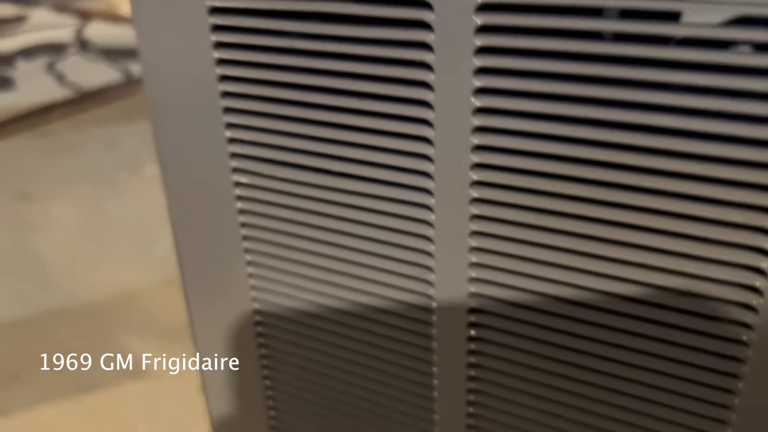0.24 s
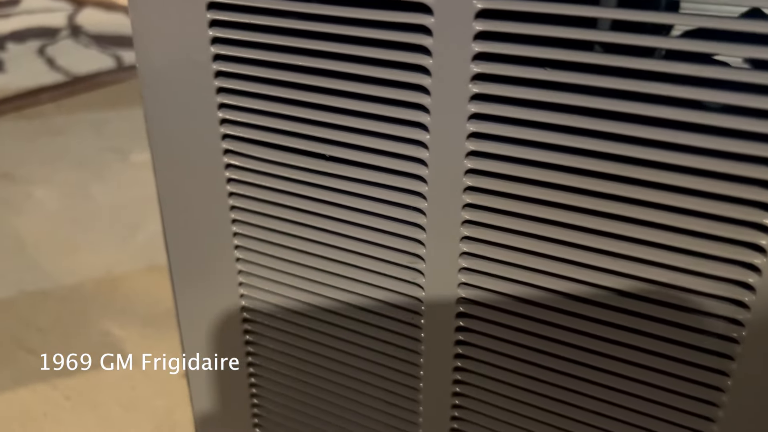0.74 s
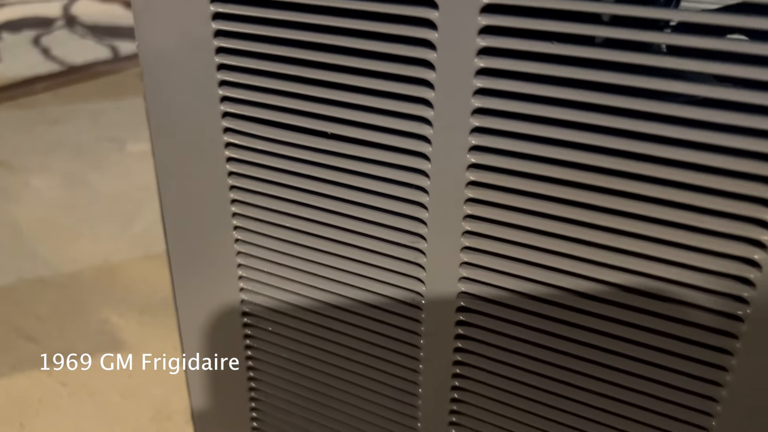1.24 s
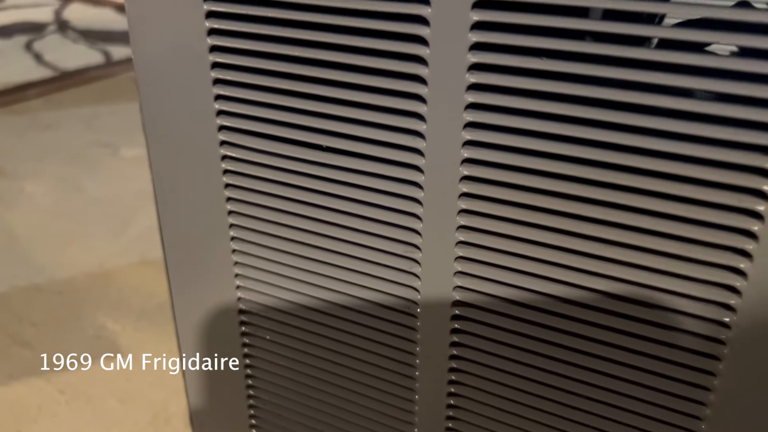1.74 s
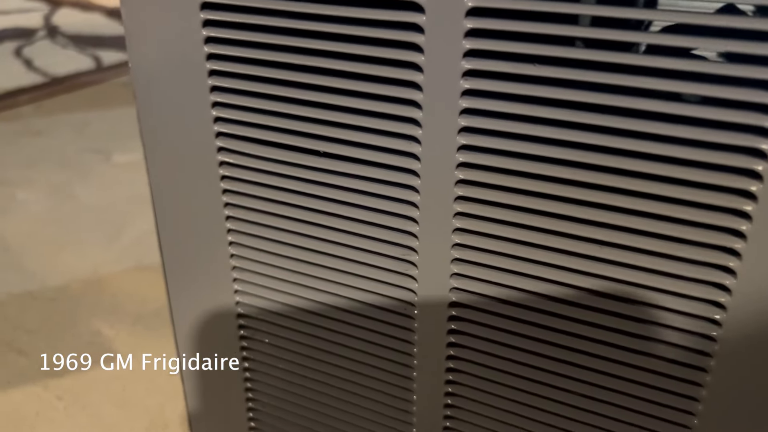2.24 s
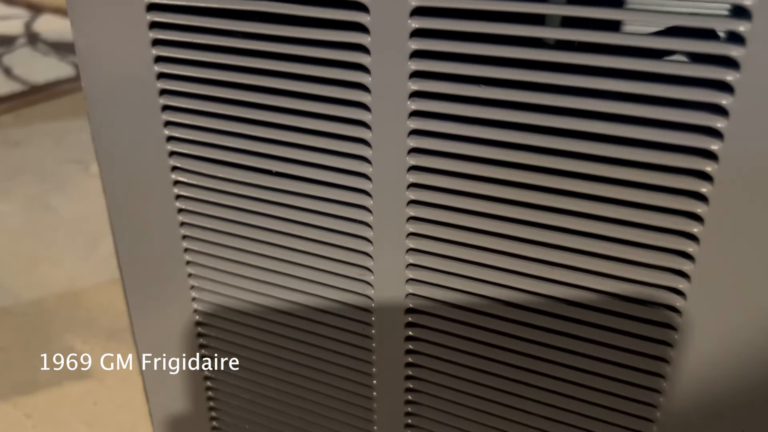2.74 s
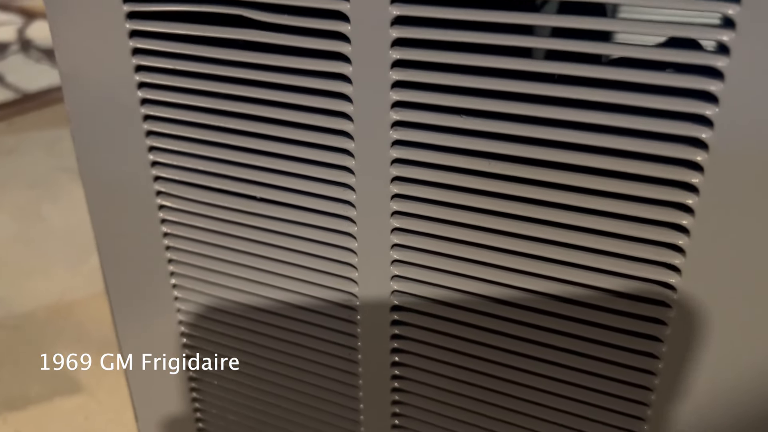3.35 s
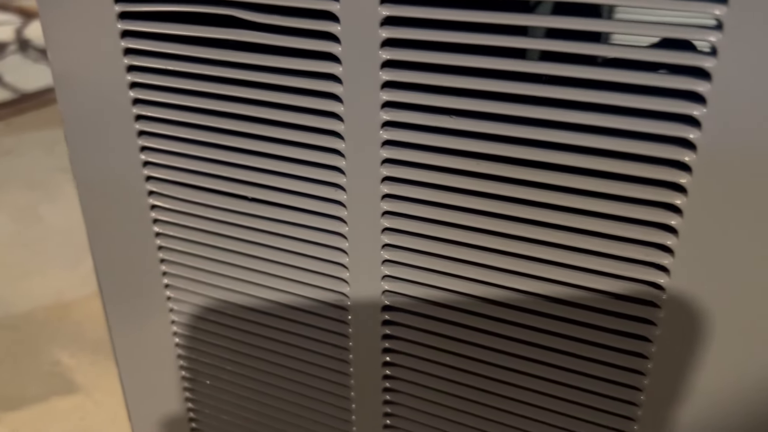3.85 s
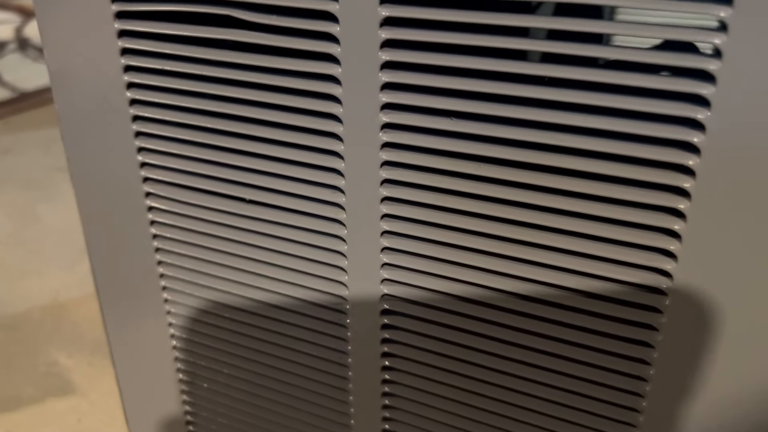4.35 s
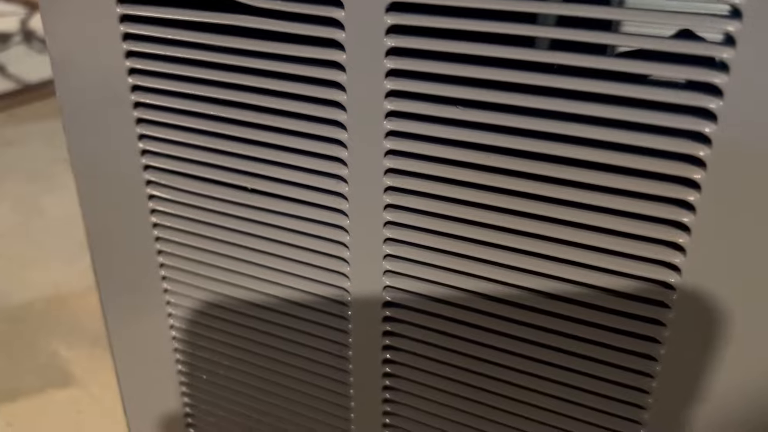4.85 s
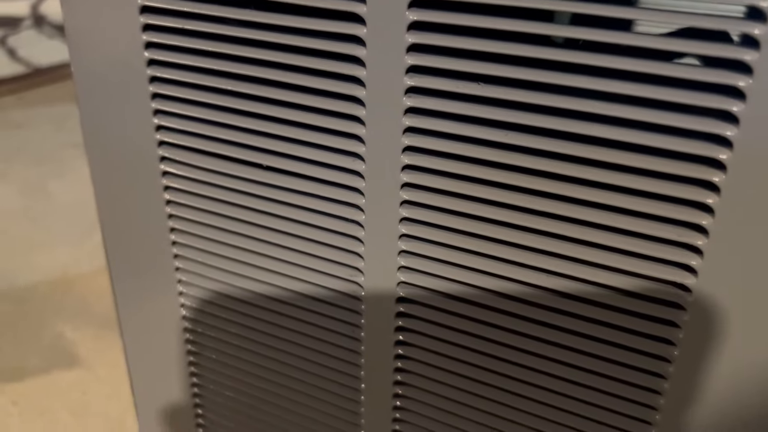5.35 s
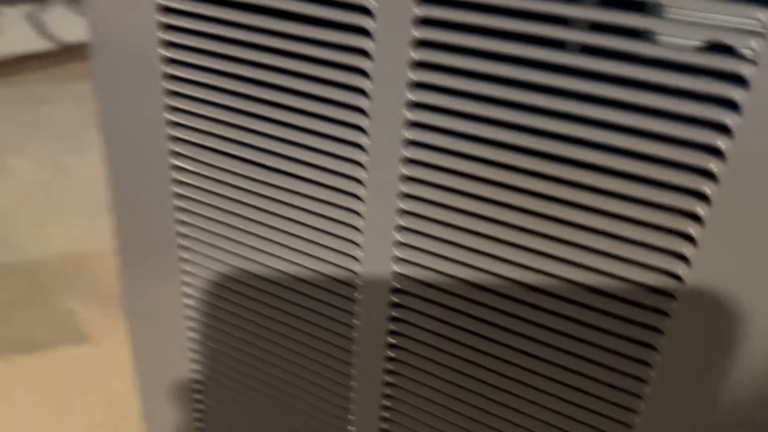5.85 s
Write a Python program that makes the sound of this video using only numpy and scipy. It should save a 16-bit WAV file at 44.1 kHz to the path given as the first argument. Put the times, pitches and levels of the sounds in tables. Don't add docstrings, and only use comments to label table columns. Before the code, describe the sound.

Close to a window air conditioner, a low airy fan rumble, a sharp relay clack, quick knocks, then a steady hissing metallic whine.

```python
import sys
import numpy as np
from scipy import signal
from scipy.fft import rfft, irfft, next_fast_len
from scipy.io import wavfile
from scipy.ndimage import uniform_filter1d, minimum_filter1d, map_coordinates

SR = 44100
rng = np.random.default_rng(int(sys.argv[2]) if len(sys.argv) > 2 else 0)


def store_pcm(level_fs):
    pcm = np.round(np.clip(level_fs, -1, 1) * 32767).astype(np.int16)
    wavfile.write(sys.argv[1], SR, np.atleast_2d(pcm).T)


def gain_from_db(level_db):
    decades = np.asarray(level_db, float) / 20
    return 10 ** decades


N = 268877
T = np.arange(N) / SR
HZ = np.fft.rfftfreq(next_fast_len(N), 1 / SR)

# time in seconds, level in dB.
RUMBLE_LEVEL = [(0, -38.5), (.3, -33), (1.0, -29.5), (1.27, -35.5), (1.59, -28.5), (2.45, -32), (2.7, -33),
                (3.75, -33), (3.95, -31.5), (5.8, -33), (5.98, -28), (6.1, -38)]
# frequency in Hz, level in dB per Hz.
RUMBLE_COLOUR = [(13, -51), (22, -14), (42, -10.5), (92, 2), (113, -3.5), (145, -16), (160, -21),
                 (210, -54), (350, -120)]
RUSH_COLOUR = [(76, -31), (130, -3), (284, -11), (321, -11.5), (474, -12), (509, -12.5), (587, -20.5),
               (779, -17), (1050, -21), (1420, -29.5), (2180, -30), (2790, -37), (3910, -41), (9000, -53.5),
               (11700, -99), (19800, -120)]
# frequency in Hz, wander in Hz, level in dB.
HUMS = [(119.2, 1.5, -40.5), (104.84, 4.07, -39.5), (87.8, 6.04, -42), (59.5, 2.8, -45.5)]
RUSH_TOP_DB = -60
RUSH_DB, RUSH_LOSS_DB = -37, -1.5
ENTRY_DB, ENTRY_S = -3, 0.12
SHAKE_DB, SHAKE_FROM_S, SHAKE_RISE_S = -48.5, 1.36, 0.86

# time in seconds, peak in dB, ring in seconds, brightness in dB.
KNOCKS = [
    (1.139, -37, 0.036, -1),
    (1.142, -33, 0.057, -1),
    (1.155, -35, 0.074, -7),
    (1.188, -46, 0.046, -8),
    (1.275, -41, 0.1, -3),
    (1.354, -41, .12, -2),
    (1.395, -42, .1, -1),
    (1.423, -37, 0.087, -4),
]
# time in seconds, peak in dB, ring in seconds, brightness in dB.
BOUNCES = [
    (1.147, -36, .05, -4),
    (1.167, -42, .06, -7),
    (1.205, -44, .06, -16),
    (1.232, -48, 0.055, -16),
]
# frequency in Hz, level in dB, 60 dB fade in seconds.
RELAY_MODES = [(226, 3.5, 0.077), (382, -3, .05), (438, 4, 0.044), (1380, -0.5, 0.045), (1626, 1, 0.043),
               (1810, -8, .03), (2065, 0, 0.064), (2260, -14, 0.12), (3040, -13, .04), (5200, -20, 0.03),
               (7370, -10, .012), (8800, -6, 0.012), (9690, -2, 0.015)]
SHELL_MODES = [(1484, -5, 0.061), (1870, -13, 0.066), (2780, -7, 0.093), (2845, -9, 0.098), (3130, -20, .1),
               (4300, -14, .04), (4830, -19, 0.065), (5900, -16, .1), (8600, -19, .08)]

# frequency in Hz, start and end in seconds, level in dB.
HELD = [
    (3290, 1.403, 1.487, -49),
    (2790, 1.42, 1.50, -57),
    (4780, 1.36, 1.44, -67),
    (5880, 1.357, 1.39, -62),
    (2860, 1.362, 1.40, -61),
]
HELD_EDGE_S = .004

# time in seconds,
# pitch of order 25 in Hz.
SHAFT = [(1.6, 1466), (5.94, 1459), (6.1, 1452)]
# time in seconds, share of full speed.
RUN_UP = [(1.35, .35), (1.42, .65), (1.47, .92), (1.51, 1)]
TICK_S = 3.0037

# place as part of a turn, level in dB, decay in ms.
VALVES = [
    (0.0, 2, 2.1),
    (.45, -12, 2),
]
# frequency in Hz, level in dB per Hz.
GAS_LOW_COLOUR = [(500, 9), (1000, -3), (1500, 0), (2000, -10.5), (2450, -10), (2780, -3.5), (3050, -8.5),
                  (3600, -13.5), (3800, -13), (3960, -14), (4130, -9), (4300, -2.5), (4550, -8.5),
                  (4900, -9), (5300, -8), (6000, -7)]
GAS_TOP_COLOUR = [(6000, -9), (6700, -8.5), (7000, -20), (7300, -0.5), (7700, -5.5), (8300, 0), (8900, 1),
                  (10000, -1.5), (10700, -2), (11100, 2), (11450, -3.5), (12000, -1), (13000, -3),
                  (15800, -3)]
# time in seconds, half length in seconds, level change in dB.
TOP_SWAY = [(3.1, 0.41, 2), (4.7, .45, 0.5)]
GAS_START_S = 1.36
HISS_DB, HISS_DB_PER_OCT = -45, 16
TOP_DB, TOP_DB_PER_OCT = -42.5, 5.5
SURGE_DB, SURGE_S = 1.5, 0.24
TICK_HZ, TICK_WIDTH_HZ, TICK_DB = 12500, 530, 1.5
# frequency and half width in Hz, time and half length in s, change in dB.
SHADOWS = [(4850, 170, 2.9, .6, -11), (6000, 250, 4.8, .7, -6), (4600, 250, 1.62, .15, -8),
           (3600, 200, 5.5, .2, -5), (3600, 200, 3.2, .4, -5), (3950, 150, 3.8, .25, -5),
           (3900, 200, 2.4, .6, -4), (3950, 200, 4.9, .35, 4), (12750, 250, 2.95, .45, 4),
           (12400, 300, 5.4, .8, -3), (7250, 100, 3.0, .6, -6), (6550, 100, 5.6, .5, -5),
           (5000, 100, 1.45, .1, -8)]

# frequency in Hz, width in Hz.
PANELS = [(3620, 120), (4540, 75), (5330, 220), (6960, 150), (7680, 40), (8330, 120), (8620, 60)]
PANEL_DB = [-62, -59.5, -57, -57.5, -65, -56.5, -66]
# time in seconds, half length in seconds, level change in dB.
PANEL_SWAY = [
    [(2.1, 1, 11)],
    [(2.3, 0.17, 2), (3.4, 0.39, 15), (4.37, 0.16, 7)],
    [(1.7, 0.32, 5.5), (4.95, .15, 1), (5.55, 0.54, 4.5)],
    [(1.65, 0.23, 4.5), (3.7, 0.3, 6.5), (4.3, 0.22, 5), (4.65, 0.14, 11), (5.5, 0.56, 6.5)],
    [(2.9, 0.64, 16)],
    [(2.3, 0.099, 3.5), (3.4, 0.41, 0), (4.35, 0.11, 5), (5.35, 0.98, 11.5)],
    [(3.6, 0.46, 18)],
]
# frequency in Hz, width in Hz.
SWEPT = [(1480, 70), (1830, 50), (2850, 130), (3290, 60)]
# level in dB at full speed, dB per octave of speed.
SWEPT_DB = [(-42, 13), (-52.5, 1), (-57, 5), (-48, 17)]
# time in seconds, half length in seconds, level change in dB.
SWEPT_SWAY = [
    [(1.38, .03, 2), (1.47, .04, 0)],
    [(1.40, .03, 3)],
    [(1.432, .012, 5), (1.37, .02, -2), (1.47, .03, 2)],
    [(1.36, 0.03, -25), (1.415, .025, 9), (1.493, .008, -9), (1.52, .025, 8)],
]

ORDER_NUMBERS = [6, 8, 10, 16, 17, 19, 24, 26, 27, 30, 31, 44, 46, 47, 48, 50, 54, 57]
ORDER_DB = [-55, -53, -48, -53, -58, -59.5, -57, -55, -59, -60, -54.5, -67, -65, -58.5, -60, -63, -56, -58]
ORDER_PAN_DB = [0, 0, 0, 5, 3, 0, -4, -4, 0, -3, -3, 3, 5, 6, 6, 3, 5, 4]
# level in dB at 2 s, change in dB per second as the speed sags.
LEADS = [(-46.5, -0.44), (-47, 0.87), (-48.5, -1.5)]
LEAD_PAN_DB = [-6, 5.5, 4.5]
# time in seconds, half length in seconds, level change in dB.
LEAD_SWAY = [
    [(1.5, 0.04, 8.5), (1.86, 0.089, -4), (2.57, 0.14, 2.5), (3.45, 0.28, 6), (4.82, .08, -3)],
    [(1.55, 0.087, -10), (2.2, .1, -3), (2.42, .15, 4), (2.95, 0.13, 4.5), (3.7, 0.2, -3.5),
     (4.33, 0.11, 3), (4.47, 0.071, -2), (4.8, 0.45, 3)],
    [(1.68, 0.16, 6.5), (2.1, 0.17, 3.5), (2.35, 0.065, -7), (3.48, 0.055, -11), (4.44, 0.085, -3),
     (4.8, 0.065, -5)],
]
CHIRP_ORDER, CHIRP_S, CHIRP_HALF_S, CHIRP_DB = 58, 1.425, .018, -56
LEAVE_S, LEAVE_DB_PER_S = 5.9, -22

# frequency in Hz, likeness from 0 to 1.
LIKENESS = [(250, 1.0), (500, .75), (850, .25), (1300, .5), (2200, .5), (3300, .6), (3900, .25), (4500, .5),
            (5600, .2), (6700, .9), (7500, .75), (9200, .92), (9600, 1), (10400, 1), (11400, .8),
            (12900, 1), (14000, 1), (15000, .8)]
# frequency in Hz, lead in radians.
PORT_LEAD = [(0, 0), (1600, .1), (3400, 1.4), (3700, 1.9), (4000, 1.6), (4300, .8), (5400, 1.2), (6400, 0),
             (7000, -.2), (9550, -np.pi), (10300, -np.pi), (13000, -2 * np.pi), (14100, -2 * np.pi),
             (15800, -8.9)]
# frequency in Hz, difference in dB.
PORT_LEAN = [(200, 0), (700, -2.5), (950, 6), (1450, 0), (2400, 2.5), (4400, 2), (5400, 6), (6500, 2),
             (8300, 1.5), (9200, 2)]

# frequency in Hz, rise of the silencing threshold in dB.
SPILL = [(2400, 0), (3300, 0), (3420, 5.5), (3650, 2.5), (3850, 4), (4100, 2.5), (4300, 0), (4600, 0),
         (4800, 2), (5100, 0), (5800, 0), (6000, 1), (6200, 0), (8900, 0), (9300, 2), (10800, 2),
         (11300, 0)]
SPILL_FLICKER_DB, SPILL_FROM_S, SPILL_RISE_S = 2.2, 1.5, .6
DROP_DB, DROP_FLICKER_DB, MASK_BANDS = -12.5, 1.6, 14
BUSY_DB = -12

SIDES = np.array([[1], [-1]])


def rms_one(x):
    return x / np.sqrt(np.mean(x ** 2) + 1e-20)


def in_time(rows):
    s, *columns = np.transpose(rows)
    return [np.interp(T, s, column) for column in columns]


def at_hz(points, hz=HZ):
    known_hz, values = np.transpose(points)
    return np.interp(np.log(hz + 1), np.log(known_hz + 1), values)


def coloured(x, gain):
    size = next_fast_len(N)
    return irfft(rfft(x, size) * gain, size)[..., :N]


def drift(rate, count=1):
    knots = rng.standard_normal((count, int(N / SR * rate) + 3))
    coarse = np.array([map_coordinates(k, [T[::64] * rate], order=3) for k in knots])
    return coarse.repeat(64, axis=1)[:, :N]


def swayed(spots):
    swells = sum(db * np.exp(-((T - s) / half_s) ** 2) for s, half_s, db in spots)
    return swells + LEAVE_DB_PER_S * np.maximum(T - LEAVE_S, 0)


def ports(pair):
    size = next_fast_len(N)
    alike = np.clip(at_hz(LIKENESS), 0, 1)
    turn = np.exp(.5j * np.interp(HZ, *np.transpose(PORT_LEAD))) * gain_from_db(at_hz(PORT_LEAN) / 2)
    a, b = rfft(pair, size)
    shared = np.sqrt((1 + alike) / 2) * a
    own = np.sqrt((1 - alike) / 2) * b
    return irfft([(shared + own) * turn, (shared - own) / turn], size)[:, :N]


def fan():
    rumble_db, = in_time(RUMBLE_LEVEL)
    shake = np.clip((T - SHAKE_FROM_S) / SHAKE_RISE_S, 0, 1)

    low = gain_from_db(at_hz(RUMBLE_COLOUR)) / (1 + (30 / (HZ + 1)) ** 6) / (1 + (HZ / 170) ** 8)
    rumble = rms_one(coloured(rng.standard_normal(N), low)) * gain_from_db(-3.5)
    for hz, width_hz, level_db in HUMS:
        cycles = np.cumsum(hz + width_hz * drift(5)[0]) / SR
        rumble += gain_from_db(level_db + 37.5 + 2.2 * drift(4.004)[0]) * np.sin(2 * np.pi * cycles)

    rush_db = RUSH_DB + RUSH_LOSS_DB * shake + ENTRY_DB * np.exp(-T / ENTRY_S)
    below = [point for point in RUSH_COLOUR if point[0] < 10000]
    top = [(11500, RUSH_TOP_DB), (16000, RUSH_TOP_DB - 9)]
    colour = gain_from_db(at_hz(below + top)) / (1 + (125 / (HZ + 1)) ** 8)
    rush = rms_one(coloured(rng.standard_normal((2, N)), colour))

    shake_colour = 1 / (1 + (HZ / 280) ** 4) / (1 + (60 / (HZ + 1)) ** 4)
    apart = rms_one(coloured(rng.standard_normal(N), shake_colour))
    mixed = ports(gain_from_db(rush_db + 3) * rush) + gain_from_db(rumble_db) * rms_one(rumble)
    return mixed + gain_from_db(SHAKE_DB) * shake * apart * SIDES


def ring(clicks, hz, t60):
    r, w = gain_from_db(-60 / (t60 * SR)), 2 * np.pi * hz / SR
    return signal.lfilter([0, np.sin(w)], [1, -2 * r * np.cos(w), r * r], clicks + 1e-18)


def knocks(blows):
    out = np.zeros((2, N))
    length = round(.4 * SR)
    t = T[:length]
    high_pass = signal.butter(2, 2500, "high", fs=SR, output="sos")
    for k, (s, peak_db, t60, bright_db) in enumerate(blows):
        i = round(s * SR)
        fade = gain_from_db(-60 * t / t60) + gain_from_db(-28 - 60 * t / 0.36)
        crack = rng.standard_normal((2, length)) * fade * (1 - np.exp(-t / .0003))
        modes = RELAY_MODES if k < 4 else SHELL_MODES
        push = crack * gain_from_db(-60 * t / 0.037)
        rings = sum(gain_from_db(db - 16.0 + rng.normal(0, 1)) * ring(push, hz, ring_s) for hz, db, ring_s in modes)
        bright = signal.sosfilt(high_pass, crack)
        out[:, i:i + length] += gain_from_db(peak_db) * (gain_from_db(bright_db) * bright + rings)
    return ports(out) + gain_from_db(-10) * out[0]


def turns():
    done = np.cumsum(in_time(SHAFT)[0] * in_time(RUN_UP)[0] / 25) / SR
    return done - done[round(TICK_S * SR)]


def held():
    out = 0
    for hz, start_s, end_s, level_db in HELD:
        on = (1 + np.tanh((T - start_s) / HELD_EDGE_S)) * (1 - np.tanh((T - end_s) / HELD_EDGE_S)) / 4
        lead = np.interp(hz, *np.transpose(PORT_LEAD)) / 2 * SIDES
        level = on * gain_from_db(level_db + 2.5 * drift(59.9)[0])
        tone = np.sqrt(2) * np.sin(2 * np.pi * hz * T + .6 * drift(40.2)[0] + lead)
        out = out + level * tone / np.maximum(abs(np.cos(lead)), .5)
    return out


def patchy(x, depth_db, width_hz, rate):
    hz, s, cells = signal.stft(x, SR, nperseg=512)
    knots = rng.standard_normal((80, 40))
    places = np.meshgrid(hz / width_hz, s * rate, indexing="ij")
    field = map_coordinates(knots, places, order=3, mode="mirror")
    shade_db = 0
    for at, wide, when, half_s, db in SHADOWS:
        shade_db = shade_db + db * np.exp(-((hz[:, None] - at) / wide) ** 2 - ((s - when) / half_s) ** 2)
    return signal.istft(cells * gain_from_db(depth_db * field + shade_db), SR, nperseg=512)[1][:, :N]


def panels(shaking, modes, levels):
    out, size = 0, next_fast_len(N)
    lines = rfft(shaking, size)
    for (hz, width_hz), level_db in zip(modes, levels):
        rung = irfft(lines / (1 + ((HZ - hz) / width_hz) ** 4), size)[:, :N]
        out = out + gain_from_db(level_db) * rms_one(rung)
    return out


def repeating(part):
    size, count = 1024, 5
    patterns = rng.standard_normal((2, count, size))[:, :, (part * size).astype(int)]
    blend = drift(0.99, count=count)
    return (patterns * blend).sum(axis=1) / np.sqrt((blend ** 2).sum(axis=0))


def gas_hiss(same, fresh, gate, octaves):
    share_db = at_hz([(800, -3.0), (1500, 0.0), (2200, -7.0), (3000, 3.5), (4500, 4.0), (6000, 7.0)])
    low = coloured(same, gain_from_db(share_db)) + fresh
    low = coloured(low, gain_from_db(at_hz(GAS_LOW_COLOUR)) * (HZ > 500) / (1 + (HZ / 6200) ** 16))

    split = 1 / (1 + (HZ / 10000) ** 16)
    colour = gain_from_db(at_hz(GAS_TOP_COLOUR)) / (1 + (6200 / (HZ + 1)) ** 16)
    plate = gain_from_db(TICK_DB / (1 + ((HZ - TICK_HZ) / TICK_WIDTH_HZ) ** 2))
    middle = coloured((gain_from_db(-0.5) * same + fresh) * (gain_from_db(14.0) + gate), colour * split)
    high = coloured((gain_from_db(1.0) * same + fresh) * (gain_from_db(-3) + gate), colour * (1 - split) * plate)

    surge_db = SURGE_DB * np.exp(-np.maximum(T - RUN_UP[-1][0], 0) / SURGE_S)
    hiss_db = HISS_DB + HISS_DB_PER_OCT * octaves + surge_db
    high_db = TOP_DB + TOP_DB_PER_OCT * octaves + swayed(TOP_SWAY)
    hiss = gain_from_db(hiss_db) * gain_from_db(3) * (rms_one(low) + rms_one(middle))
    hiss = hiss + gain_from_db(high_db + 3.5) * rms_one(high)
    return patchy(hiss * (T > GAS_START_S), depth_db=2.0, width_hz=250, rate=1.13)


def gas(turn, running):
    part = turn % 1
    gate = sum(gain_from_db(db) * np.exp(-((part - at) % 1) / (ms * 0.067)) for at, db, ms in VALVES)
    same = repeating(part)
    fresh = rng.standard_normal((2, N))
    gate = gate * gain_from_db(1.7 * drift(3.02))
    octaves = np.log2(in_time(RUN_UP)[0])
    hiss = gas_hiss(same, fresh, gate, octaves)

    shaking = same + 0.26 * fresh
    panel_db = [db + swayed(spots) for db, spots in zip(PANEL_DB, PANEL_SWAY)]
    rung = running * panels(shaking * (gain_from_db(6.0) + gate), PANELS, panel_db)
    swept_db = [db + per_oct * octaves + swayed(spots) for (db, per_oct), spots in zip(SWEPT_DB, SWEPT_SWAY)]
    swept = (T > GAS_START_S) * (1 - running) * panels(shaking, SWEPT, swept_db)
    return ports(hiss + rung + gain_from_db(1.0) * swept)


def whine(turn, running):
    out = np.zeros((2, N))
    swells = drift(3.0, count=len(ORDER_DB))
    levels = [level_db + 2.6 * swell for level_db, swell in zip(ORDER_DB, swells)]
    levels += [db + per_s * (T - 2) + swayed(spots) for (db, per_s), spots in zip(LEADS, LEAD_SWAY)]
    orders = ORDER_NUMBERS + [25, 55, 56]
    pans_db = ORDER_PAN_DB + LEAD_PAN_DB
    phases = np.pi / 2 * np.square(orders)
    for order, level_db, pan_db, phase in zip(orders, levels, pans_db, phases):
        lead = np.interp(order * 58.5, *np.transpose(PORT_LEAD)) / 2
        wobble = 0.46 * drift(1.504)[0] + 0.21 * drift(14)[0]
        tone = np.sqrt(2) * np.sin(2 * np.pi * order * turn + phase + wobble + lead * SIDES)
        tone = tone / max(abs(np.cos(lead)), .5)
        out += gain_from_db(level_db + 0.9 * drift(30)[0]) * gain_from_db(pan_db / 2 * SIDES) * tone
    chirp_level = gain_from_db(CHIRP_DB) * np.exp(-((T - CHIRP_S) / CHIRP_HALF_S) ** 2)
    return running * out + chirp_level * np.sin(2 * np.pi * CHIRP_ORDER * turn)


def scene():
    turn = turns()
    running = np.clip((T - 1.485) / .06, 0, 1)
    start = knocks(KNOCKS) + knocks(BOUNCES)
    return fan() + start + held() + gas(turn, running) + whine(turn, running)


def masked(x):
    shift, size, top, group = 136, 2048, 1020, 5
    pair = np.pad([x[0] + x[1], x[0] - x[1]], [(0, 0), (shift, 0)]) / 2
    hz, s, cells = signal.stft(pair, SR, window="cosine", nperseg=size)
    power = (abs(cells[:, :top]) ** 2).reshape(2, top // group, group, -1).mean(axis=2)

    own = uniform_filter1d(rng.standard_normal(power.shape), size=2, axis=2) * np.sqrt(2)
    flicker = own + drift(22)[0][np.minimum(s * SR, N - 1).astype(int)]
    spill_rise = np.clip((s - SPILL_FROM_S) / SPILL_RISE_S, 0, 1)
    spill_db = at_hz(SPILL, hz[2:top:group])[:, None] * spill_rise
    flicker_db = DROP_FLICKER_DB + SPILL_FLICKER_DB * np.minimum(spill_db / 2, 1)
    mask_db = DROP_DB + spill_db + flicker_db * flicker
    around = uniform_filter1d(power.mean(axis=0), size=MASK_BANDS * 2 + 1, axis=0)
    mask = around * gain_from_db(2 * mask_db)

    treble = minimum_filter1d(power[:, 60:].sum(axis=(0, 1)), size=5)
    strong = uniform_filter1d(power, size=2, axis=2) > mask
    quiet_moment = treble < np.median(treble) * gain_from_db(2 * BUSY_DB)
    keep = strong | (hz[:top:group, None] < 3350) | quiet_moment
    kept = cells[:, :top] * keep.repeat(group, axis=1)
    back = signal.istft(kept, SR, window="cosine", nperseg=size, nfft=size)[1]
    mid, side = back[:, shift:N + shift]
    return np.array([mid + side, mid - side])


def roll_off(x):
    return signal.sosfilt(signal.butter(12, 16410, fs=SR, output="sos"), x)


def record(dry):
    mix = masked(coloured(dry, HZ < 15800))
    return roll_off(mix)


dry = scene()
out = record(dry)
store_pcm(out)
```